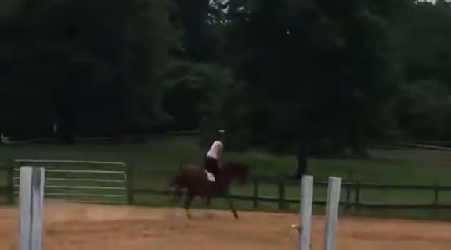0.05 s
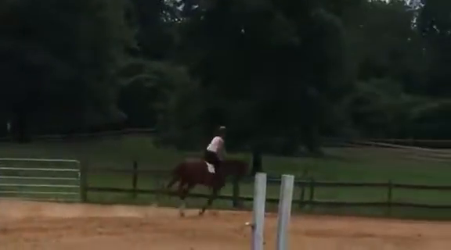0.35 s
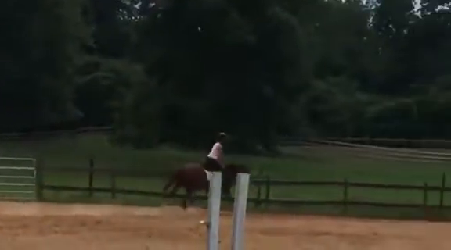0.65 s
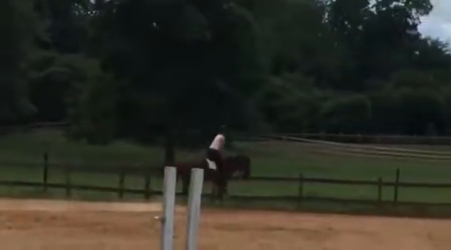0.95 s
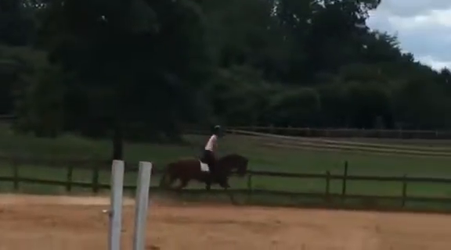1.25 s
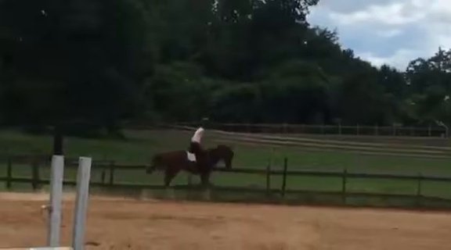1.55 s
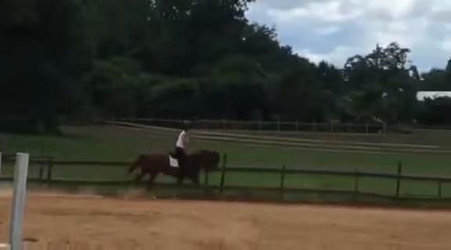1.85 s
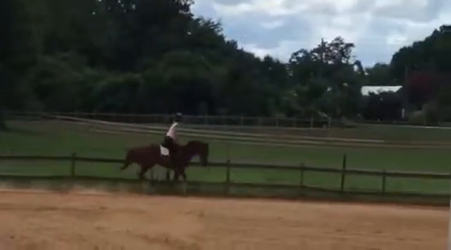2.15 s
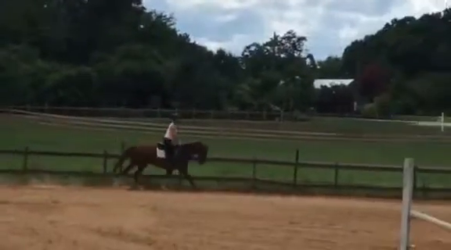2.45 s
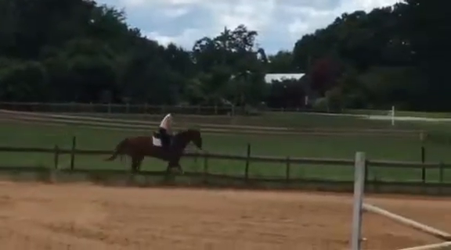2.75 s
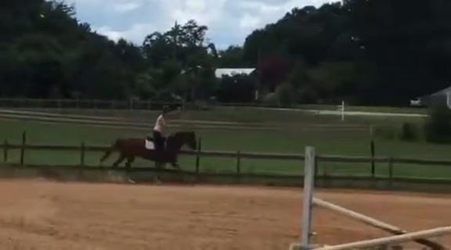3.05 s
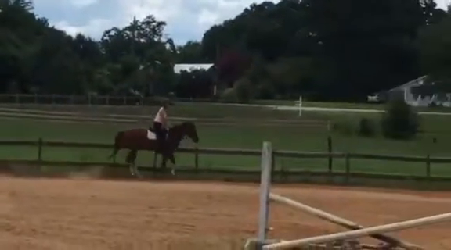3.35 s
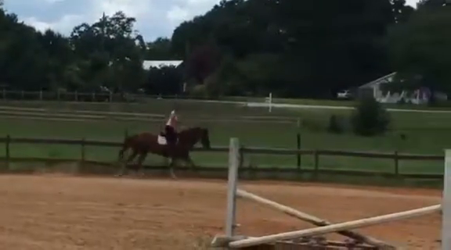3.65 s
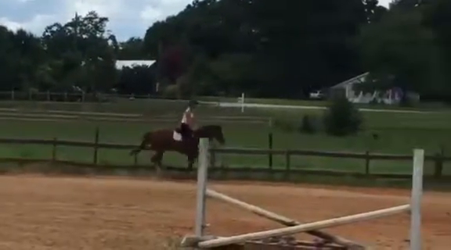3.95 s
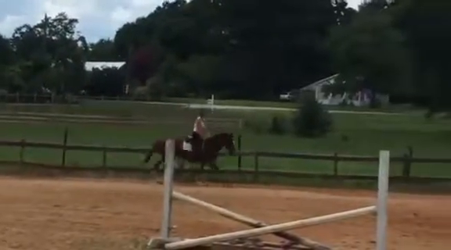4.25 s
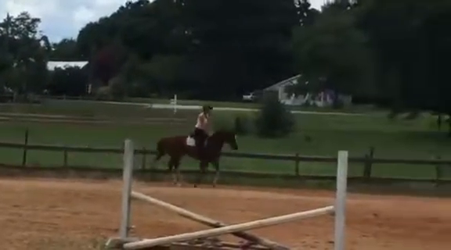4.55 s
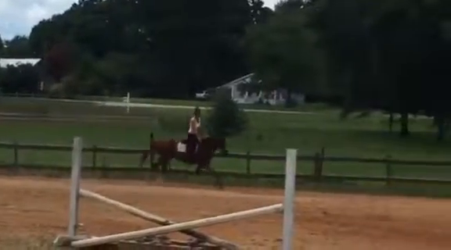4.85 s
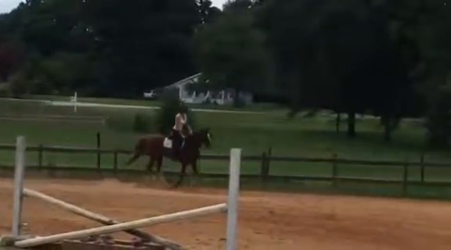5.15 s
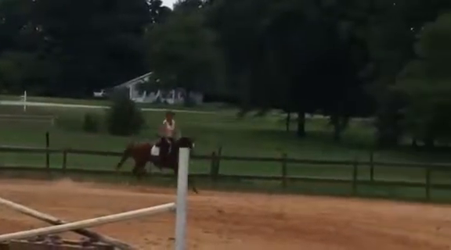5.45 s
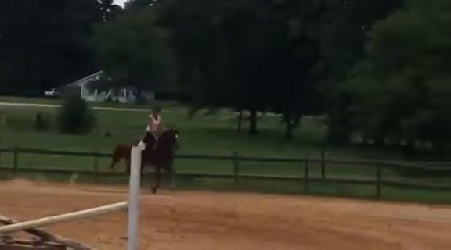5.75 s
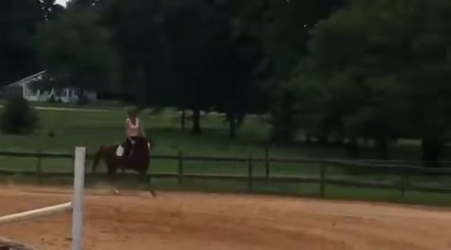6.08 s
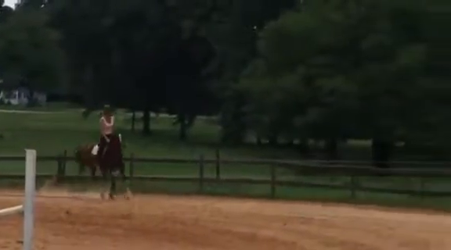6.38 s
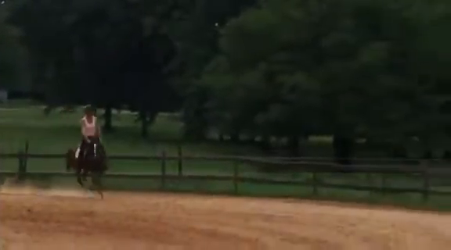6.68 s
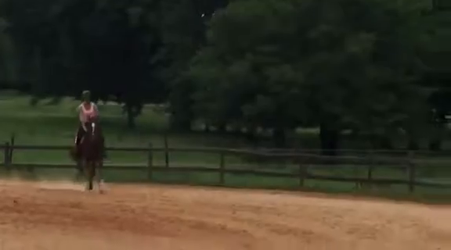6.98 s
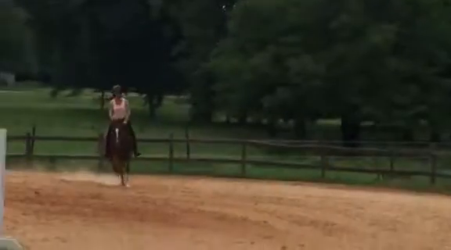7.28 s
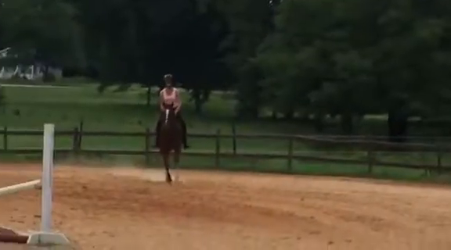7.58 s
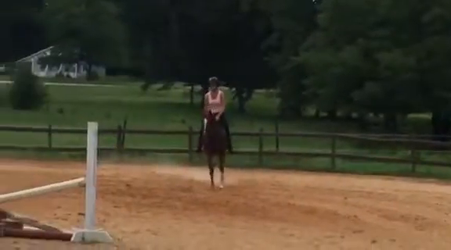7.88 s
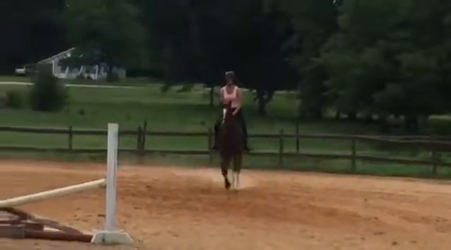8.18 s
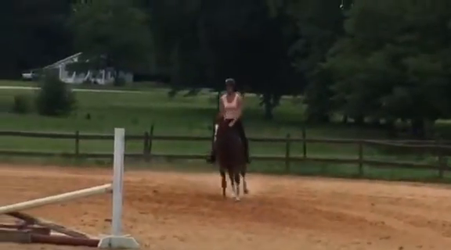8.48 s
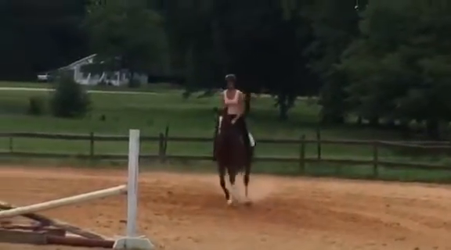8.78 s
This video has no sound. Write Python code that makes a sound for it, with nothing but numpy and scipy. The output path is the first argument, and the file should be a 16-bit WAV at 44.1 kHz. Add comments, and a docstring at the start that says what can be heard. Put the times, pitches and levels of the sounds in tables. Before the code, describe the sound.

Continuous low camera rumble and rapid soft knocking cover a distant horse's faint canter on sand, light tack ticks and thin bird chips.

```python
"""Distant canter, rumbling camera

A horse canters round a sand arena, far from a hand-held camera whose drive knocks and rumbles into
the microphone. Soft hoof thuds, sprays of sand and ticks of tack rise faintly from the outdoor air.
A small bird chips about once a second and the tree line echoes it; other birds whistle further off."""
import sys
import numpy as np
from scipy import signal
from scipy.fft import rfft, irfft
from scipy.io import wavfile
from scipy.ndimage import uniform_filter1d

SR = 44100
rng = np.random.default_rng(int(sys.argv[2]) if len(sys.argv) > 2 else 0)


def to_wav(sig):
    """Store sig (one row per channel, or 1-D mono) as 16-bit WAV at the path in sys.argv[1].

    Samples outside -1..1 are clipped; the rate is SR.
    """
    pcm = np.clip(np.atleast_2d(sig), -1, 1) * 32767
    pcm = np.round(pcm).astype(np.int16)
    wavfile.write(sys.argv[1], SR, pcm.T)  # frames by channels


N = 388962
TIME = np.arange(N) / SR

# canter strides: first footfall t/s, thud level/dB, spray level/dB, footfall width/s
CANTER_STRIDES = [(.38, -73, -75, 0.014), (.94, -69, -80, 0.01), (1.526, -60, -65, 0.011),
                  (2.115, -68, -74, 0.011), (2.76, -67, -73, 0.0067), (3.351, -62, -63, 0.018),
                  (3.946, -63.5, -66.5, 0.021), (4.604, -67, -67, 0.012), (5.15, -65.5, -68, 0.021),
                  (5.818, -58.5, -73, 0.024), (6.285, -64.5, -78, 0.02), (6.829, -66, -85, 0.0093),
                  (7.501, -66, -80, 0.027), (8.103, -61.5, -75, 0.011), (8.677, -63.5, -64.5, 0.013)]
# the three footfalls of a stride: delay/s, thud gain/dB, spray gain/dB
STRIDE_FOOTFALLS = [(0, 5.5, -2.5), (.047, -5, -8.5), (0.13, -6.5, -10.5)]
# scuffs of loose sand, and at 8.781 s a sharp tick: peak t/s, level/dB, f/Hz, half width/s
SAND_SCUFFS = [(1.573, -65, 4220, 0.011), (2.061, -73, 4500, 0.012), (2.159, -72, 3700, .025),
               (2.264, -65, 4000, 0.0061), (2.66, -74, 3800, 0.018), (2.773, -72, 4200, 0.01),
               (3.35, -59, 3030, 0.0094), (3.351, -57, 1700, .008), (3.394, -63, 4000, 0.011),
               (3.406, -57, 1900, 0.0075), (4.553, -68, 3200, .01), (5.775, -70, 2820, 0.047),
               (5.828, -57, 600, .016), (5.829, -56, 1150, .013), (5.826, -59, 1890, .016),
               (5.83, -65, 3130, 0.016), (5.88, -70, 3800, .008), (6.334, -70, 5800, .016),
               (7.14, -69, 7500, 0.0081), (7.225, -69, 6200, .012), (7.414, -72, 6800, .014),
               (8.355, -75, 5500, 0.013), (8.781, -57, 7000, .002), (8.794, -68, 7000, 0.0087)]
# sharp ticks of the tack: t/s, level/dB, f/Hz, decay/s
BUCKLE_TICKS = [(0.713, -63, 6900, 0.0018), (1.585, -65, 3700, 0.0066), (1.661, -62, 3200, .006),
                (2.427, -70, 4000, 0.0034), (3.36, -51, 3900, 0.0023), (3.499, -56, 5200, 0.0035),
                (4.065, -66, 4500, 0.007), (4.18, -60, 7500, 0.0019), (4.933, -63, 3770, .008),
                (5.857, -52.5, 2900, 0.004), (6.124, -61, 6000, 0.004), (7.731, -61, 5200, 0.0041),
                (8.785, -51.5, 2980, 0.0055)]
# camera body answering the spindle's knock: multiple of the turn rate, level/dB
KNOCK_HARMONICS = [(1, -100), (3, -96), (4, -80), (5, -66), (6, -64), (7, -59.5), (8, -43), (9, -47.5),
                   (10, -39.5), (11, -40.5), (12, -53.5), (13, -47.5), (14, -49), (15, -48.5), (16, -41.5),
                   (17, -47), (18, -48.5), (19, -40.5), (20, -42.5), (21, -49.5), (22, -61.5), (25, -93.5),
                   (40, -100)]
# load on the drive, weighting the knock: t/s, gain/dB
DRIVE_LOAD = [(0, -8.5), (2, -7.5), (6, -5.5), (8.8, -5)]
# rough spots of the slow wheel: t/s into the turn, level/dB, f/Hz, half width/s
ROUGH_SPOTS = [(.002, -30.5, 58.7, 0.03), (0.06, -33, 61.6, 0.0083), (0.117, -41, 70.4, .035),
               (0.242, -32.5, 62.4, .012), (0.311, -32, 65.8, .017), (0.381, -29.5, 58.2, .016),
               (.412, -30.5, 65, 0.013), (.468, -28, 62.5, 0.014), (0.498, -31.5, 63, .014),
               (0.571, -34, 58.2, 0.012), (0.611, -27.5, 59.9, .014), (0.688, -40, 60.1, .011),
               (0.745, -29, 55.7, .018), (0.795, -27.5, 66.2, 0.022), (0.872, -34.5, 64.2, 0.014),
               (0.942, -27.5, 64.14, 0.021), (.998, -32.5, 70, 0.012), (1.035, -32, 58.3, 0.013)]
# grind of the wheel's worn teeth: f/Hz, level/dB per Hz
GRIND_SPECTRUM = [(20, -86.5), (36, -72), (46, -63.5), (60, -68.5), (74, -63), (84, -68.5), (130, -88),
                  (400, -140)]
# irregular rumble of the drive: f/Hz, level/dB per Hz
RUMBLE_SPECTRUM = [(10, -86), (28, -72.5), (58, -56.5), (72, -56), (82, -62), (95, -62), (120, -66.5),
                   (142, -67), (168, -67.5), (192, -63), (218, -75), (245, -76.5), (295, -90), (350, -80.5),
                   (450, -100), (900, -120)]
# motor hum: f/Hz, rms level/dB
MOTOR_TONES = [(29.8, -81.5), (120, -51), (402, -72), (592, -72)]
# the hand bumps the camera, and at 4.72 s a hoof thud shakes it: t/s, shell f/Hz, level/dB
HAND_BUMPS = [(1.826, 287, -50), (2.373, 287, -42.5), (2.785, 240, -40.5), (2.885, 278, -39),
              (3.05, 269, -49), (4.72, 345, -46)]
# chips of the near bird: t/s, upper voice f/Hz, level/dB, lower voice gain/dB
BIRD_CHIPS = [(.989, 7360, -58, -4), (2.296, 7640, -59.5, 2), (3.592, 7300, -53, -0.5),
              (4.777, 7400, -54, 0.5), (5.771, 7370, -54, -3), (6.646, 7450, -53, 1),
              (7.75, 7610, -54, 3.5)]
# far whistles: peak t/s, start f/Hz, end f/Hz, half width/s, level/dB
FAR_WHISTLES = [(2.251, 2630, 2590, 0.011, -60), (2.478, 1575, 1810, .022, -58.5),
                (4.454, 2550, 2470, 0.0078, -55), (4.692, 1820, 1610, 0.014, -59),
                (6.299, 1250, 1280, .03, -60), (6.876, 1288, 1264, 0.014, -54.5),
                (7.194, 1270, 1328, 0.031, -57.5)]
# outdoor air and microphone hiss: f/Hz, level/dB per Hz
AIR_SPECTRUM = [(100, -82.5), (450, -82), (650, -81.5), (820, -83), (1300, -83), (1850, -92), (2200, -97.5),
                (2700, -97.5), (4400, -107), (5000, -113), (6400, -112), (7600, -117), (9000, -114)]
# breeze in the trees: t/s, gain/dB
BREEZE_SWELL = [(0, -6.5), (2, -5), (5.8, -3.5), (8.8, -4.5)]
# bands of leaf rustle: f/Hz, level/dB
LEAF_BANDS = [(2000, -69), (3600, -82.5), (6800, -80.5)]


def hooves(grain_db=1.5, clop_db=-3, patter_db=-78):
    """Each footfall packs the sand with a soft thud and a hollow clop, and throws up a spray of grains."""
    thud, spray = np.zeros((2, N))
    t = np.arange(-SR // 10, SR // 10) / SR
    for s, thud_db, spray_db, width_s in CANTER_STRIDES:
        for lag_s, foot_thud_db, foot_spray_db in STRIDE_FOOTFALLS:
            press = bell(t, width_s * np.where(t < 0, .53, .87))  # quick in, slower out
            add(thud, s + lag_s + t[0], undb(thud_db + foot_thud_db) * press)
            add(spray, s + lag_s + t[0], undb(spray_db + foot_spray_db) * press)
    # loose sand keeps pattering down between the steps
    spray = np.hypot(spray, undb(patter_db + 2 * wander(30)))
    grains = rng.standard_normal(N) * undb(grain_db * np.minimum(rng.exponential(size=N), 4))
    body = band(rng.standard_normal(N), 250, 1600)
    clop = undb(clop_db) * band(rng.standard_normal(N), 1147, 1330)
    steps = thud * (body + clop) + spray * band(grains, 2950, 4520)
    return tree_echo(steps, t60_s=.12, wet_db=-18.5, build_s=.011)


def scuffs(spread=1.2, rasp_hz=3500, gain_db=-3):
    """Sand slides and scatters in gritty swells, rasping most in one narrow range of the treble; one sharp tick
    sounds near the end."""
    sand, t = np.zeros(N), np.arange(-SR // 8, SR // 8) / SR
    for s, db, hz, half_s in SAND_SCUFFS:
        grit = band(rng.standard_normal(len(t)), hz / spread, hz * spread)
        add(sand, s + t[0], undb(db) * bell(t, half_s) * grit)
    rasp = signal.lfilter(*signal.iirpeak(rasp_hz, Q=5.4, fs=SR), sand)
    return undb(gain_db) * (sand + .97 * rasp)


def tack(spread=1.52):
    """Buckles tick against each other in bright, fast-dying bursts."""
    out, t = np.zeros(N), TIME[:SR // 20]
    for s, db, hz, decay_s in BUCKLE_TICKS:
        burst = band(rng.standard_normal(len(t)), hz / spread, hz * spread)
        add(out, s - decay_s, undb(db) * np.exp(-t / decay_s) * burst)
    return out


def drive():
    """Knocks, shudders, bearing rumble and thin motor tones, all carried through the camera body."""
    hum = sum(undb(db) * np.sqrt(2) * np.sin(2 * np.pi * (hz * TIME + rng.random()))
              for hz, db in MOTOR_TONES)
    return spindle() * undb(curve(DRIVE_LOAD)) + wheel() + coloured(RUMBLE_SPECTRUM) + hum


def spindle(turn_hz=10.7294, first_s=.0628, sway_db=.5, contact_s=.0042, drift_s=.00026, linger=1.036):
    """One soft, rounded knock a turn; the camera body rings after it."""
    size = int(SR / turn_hz)
    harmonics = undb(np.interp(np.arange(size // 2 + 1), *np.transpose(KNOCK_HARMONICS)))
    cepstrum = irfft(np.log(harmonics), size)
    # the push is symmetric in time; reflections later than the contact only follow it
    lag_s = np.fft.fftfreq(size) * size / SR
    follow = 1 + linger * np.sign(lag_s) * (1 - np.exp(-(lag_s / contact_s) ** 4))
    knock = irfft(np.exp(rfft(cepstrum * follow)), size) * size / np.sqrt(2)
    turns = (TIME - first_s + drift_s * wander(1.5)) * turn_hz
    knocks = np.interp(turns, np.arange(size) / size, knock, period=1) * undb(sway_db * wander(10))
    # rubber mounts let no treble through
    return signal.sosfiltfilt(signal.butter(3, 700, fs=SR, output="sos"), knocks)


def wheel(turn_s=1.07438, sway_db=.76, oval_db=4.5, oval_at_s=.48):
    """The slow wheel's rough spots shake the camera body on every turn; worn teeth grind underneath."""
    t = TIME[:int(turn_s * SR)]
    s, db, hz, half_s = np.transpose(ROUGH_SPOTS)[:, :, None]
    since_s = (t - s + turn_s / 2) % turn_s - turn_s / 2
    energy = (undb(db) * bell(since_s, half_s)) ** 2 + 1e-18
    pitch_hz = (energy * hz).sum(0) / energy.sum(0)  # the strongest spot leads
    cycles = np.cumsum(pitch_hz) / SR
    cycles *= np.round(cycles[-1]) / cycles[-1]  # each turn ends as it began
    shudder = np.sqrt(energy.sum(0)) * np.sin(2 * np.pi * cycles)
    # slightly oval, the wheel presses hardest every half turn
    pressure = undb(oval_db * np.cos(4 * np.pi * (t - oval_at_s) / turn_s))
    grind = coloured(GRIND_SPECTRUM, len(t)) * pressure
    return np.resize(shudder + grind, N) * undb(sway_db * wander(8))


def hand(rise_s=.0058, body_ratio=.39, body_db=-1):
    """Soft pushes on the camera, and one heavy hoof thud, briefly ring its shell and the heavier body below it."""
    out, t = np.zeros(N), TIME[:SR // 10]
    push = t / rise_s * np.exp(1 - t / rise_s)
    for s, hz, db in HAND_BUMPS:
        shell = np.sin(2 * np.pi * hz * t)
        body = undb(body_db) * np.sin(2 * np.pi * body_ratio * hz * t)
        add(out, s, undb(db) * push * (shell + body))
    return out


def near_bird(length_s=.024, low_ratio=.875, upper_late_s=.004, buzz_hz=320, flutter_db=1.2):
    """Both sides of the syrinx flick upward, buzz and sag, the lower first; no two chips quiver alike."""
    out, progress = np.zeros(N), np.linspace(0, 1, int(length_s * SR))
    arch = np.interp(progress, [0, .25, .65, 1], [.92, 1.01, 1.01, .95])
    effort = np.interp(progress, [0, .18, .55, 1], [.3, .38, .34, .33])
    quiver = 1 + .024 * wander(700) + .027 * np.sin(2 * np.pi * buzz_hz * TIME)
    flutter = undb(flutter_db * wander(300))
    for s, upper_hz, db, low_db in BIRD_CHIPS:
        for ratio, voice_db, late_s in ((1, 0, upper_late_s), (low_ratio, low_db, 0)):
            moment = rng.integers(N - len(arch)) + np.arange(len(arch))
            voice = glide(upper_hz * ratio * arch * quiver[moment])
            add(out, s + late_s, undb(db + voice_db) * effort * flutter[moment] * voice)
    return tree_echo(out, t60_s=.5, wet_db=.8, build_s=.004)


def far_birds(edge_db=-9):
    """Short, pure whistles, firm in the middle and soft at the edges, faintly echoed by the trees."""
    out, t = np.zeros(N), np.arange(-SR // 18, SR // 18) / SR
    fade = signal.windows.tukey(len(t), .5)
    for s, start_hz, end_hz, half_s, db in FAR_WHISTLES:
        swell = np.maximum(np.exp(-.5 * (t / half_s) ** 4), undb(edge_db))
        whistle = glide(np.linspace(start_hz, end_hz, len(t)))
        add(out, s + t[0], undb(db) * swell * fade * whistle)
    return tree_echo(out, t60_s=.3, wet_db=-14, build_s=.01)


def air(flicker_db=.5, rustle_db=2.5):
    """A soft wash that swells with the breeze; leaves rustle unevenly on top."""
    leaves = np.zeros(N)
    for hz, db in LEAF_BANDS:
        hiss = band(rng.standard_normal(N), hz / 1.25, hz * 1.28, order=3)
        leaves += hiss * undb(db + rustle_db * np.tanh(wander(14)))
    return (coloured(AIR_SPECTRUM) + leaves) * undb(curve(BREEZE_SWELL) + flicker_db * wander(9.8))


def tree_echo(x, t60_s, wet_db, build_s):
    """Leaves and trunks scatter the sound back as a dense, fading tail."""
    t = TIME[:SR]
    envelope = undb(-60 * t / t60_s) * (1 - np.exp(-t / build_s))
    tail = rng.standard_normal(SR) * envelope
    return x + undb(wet_db) * signal.fftconvolve(x, tail / np.linalg.norm(tail))[:N]


def undb(db):
    """Decibels to gain."""
    return 10 ** (np.asarray(db) / 20)


def curve(rows):
    """An envelope of straight lines through (t/s, value) points."""
    return np.interp(TIME, *np.transpose(rows))


def bell(t, half_s):
    """A smooth swell and fade around t = 0."""
    return np.exp(-.5 * (t / half_s) ** 2)


def wander(rate_hz):
    """Smooth random modulation with spread 1."""
    hold = int(SR / rate_hz)
    steps = np.repeat(rng.standard_normal(N // hold + 1), hold)
    smooth = uniform_filter1d(steps, hold)[:N]
    return smooth / smooth.std()


def glide(hz):
    """A sine that follows a pitch curve."""
    return np.sin(2 * np.pi * np.cumsum(hz) / SR)


def coloured(points, size=N):
    """Seamlessly looping noise, shaped by (f/Hz, level/dB per Hz) points."""
    hz, db = np.transpose(points)
    bins_hz = np.maximum(np.fft.rfftfreq(size, 1 / SR), 1)
    gain = undb(np.interp(np.log(bins_hz), np.log(hz), db))
    return irfft(rfft(rng.standard_normal(size)) * gain, size) * np.sqrt(SR / 2)


def band(x, low_hz, high_hz, order=2):
    """Band-pass, scaled to rms 1."""
    y = signal.sosfilt(signal.butter(order, [low_hz, high_hz], "band", fs=SR, output="sos"), x)
    return y / y.std()


def add(out, start_s, sound):
    """Mix a sound in at a time, trimming any overhang."""
    start = int(round(start_s * SR))
    a, b = max(start, 0), min(start + len(sound), N)
    if b > a:
        out[a:b] += sound[a - start:b - start]


def scene():
    """Horse, camera, birds and air meet at one microphone."""
    return (hooves() + scuffs() + tack() + drive() + hand() + near_bird() + far_birds() + air())[None]


def record(dry):
    """The camera cuts the top steeply above 9 kHz."""
    return signal.sosfilt(signal.ellip(10, .2, 80, 9000, fs=SR, output="sos"), dry)


dry = scene()
out = record(dry)
to_wav(out)
```